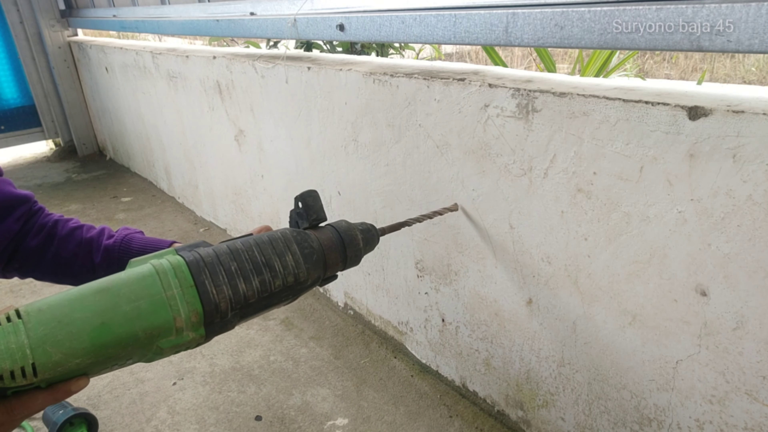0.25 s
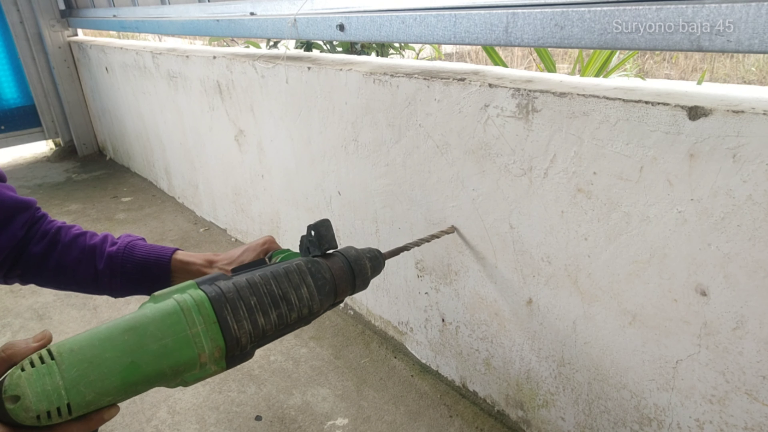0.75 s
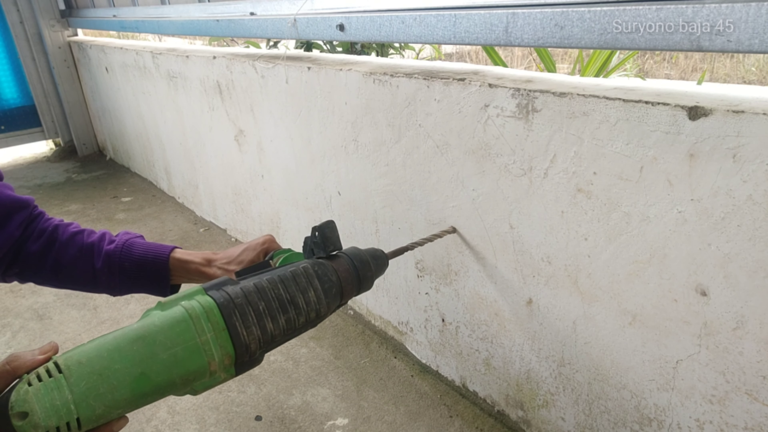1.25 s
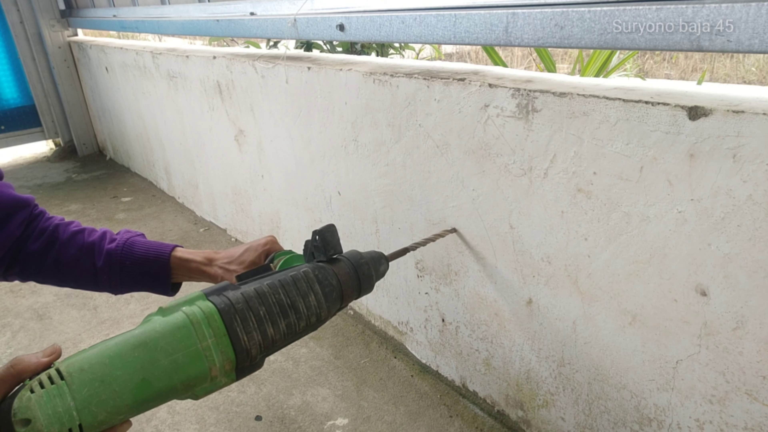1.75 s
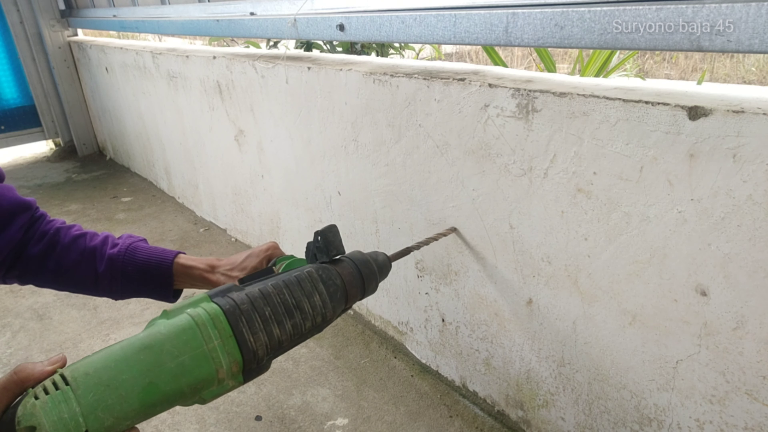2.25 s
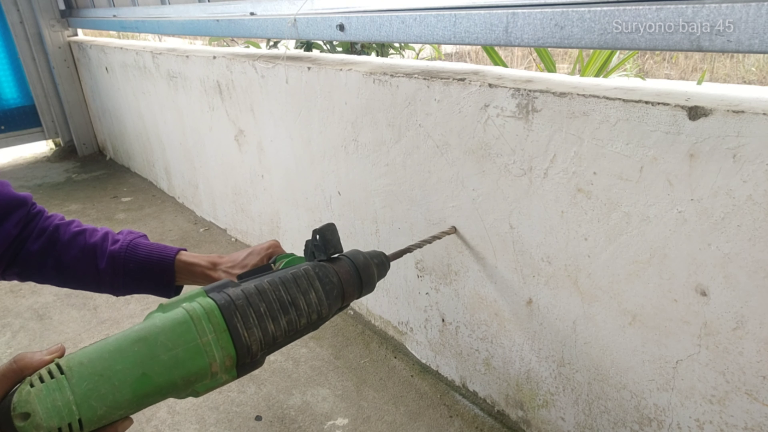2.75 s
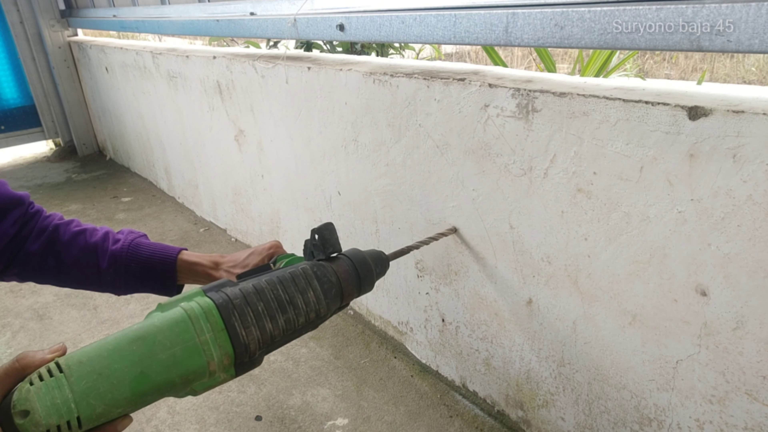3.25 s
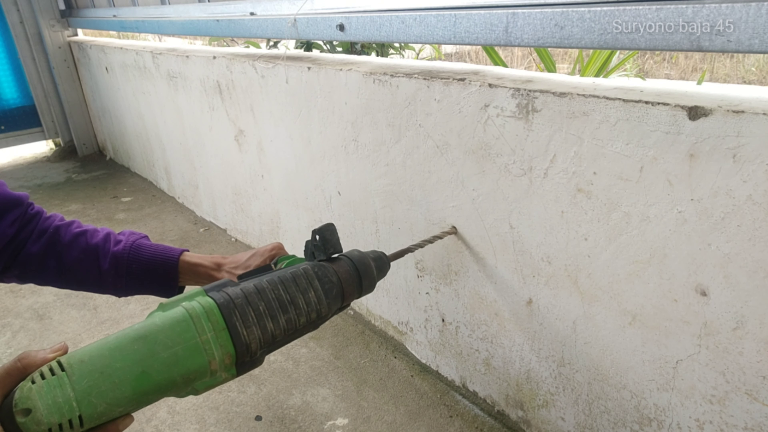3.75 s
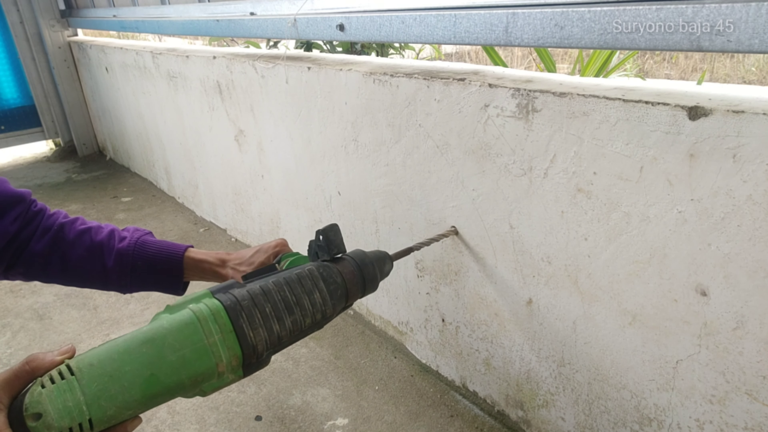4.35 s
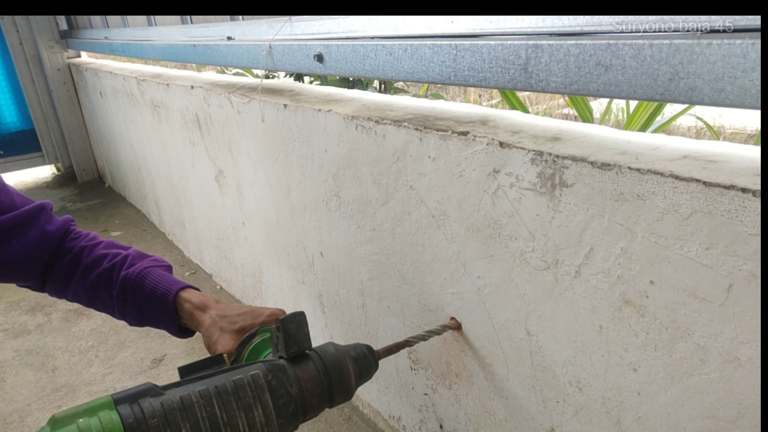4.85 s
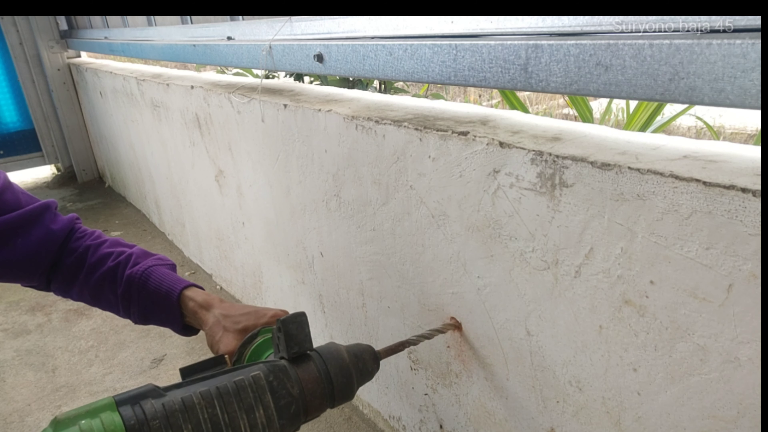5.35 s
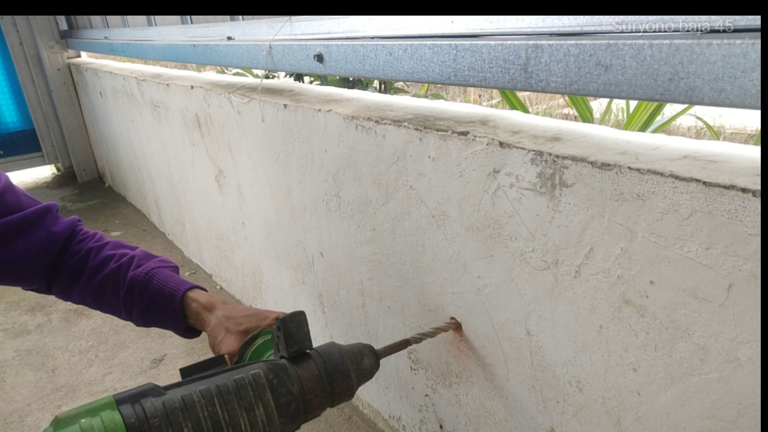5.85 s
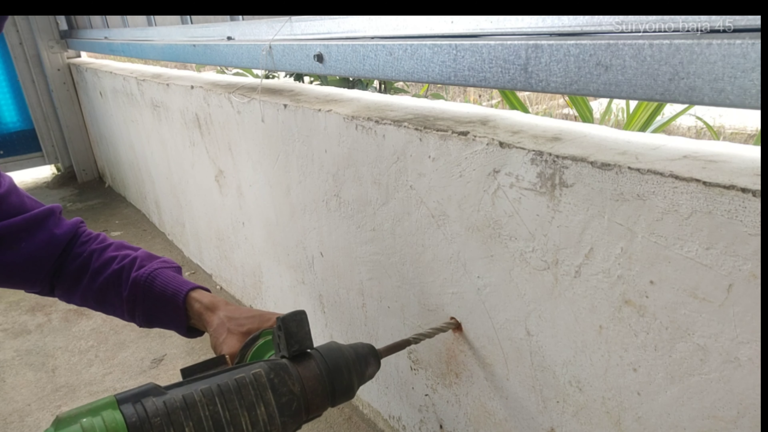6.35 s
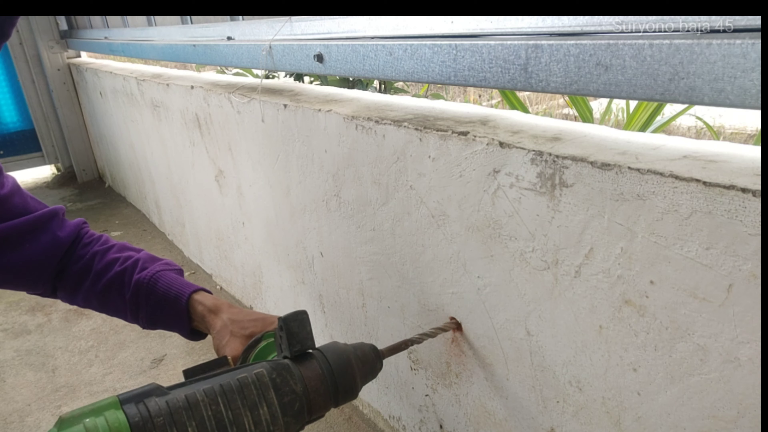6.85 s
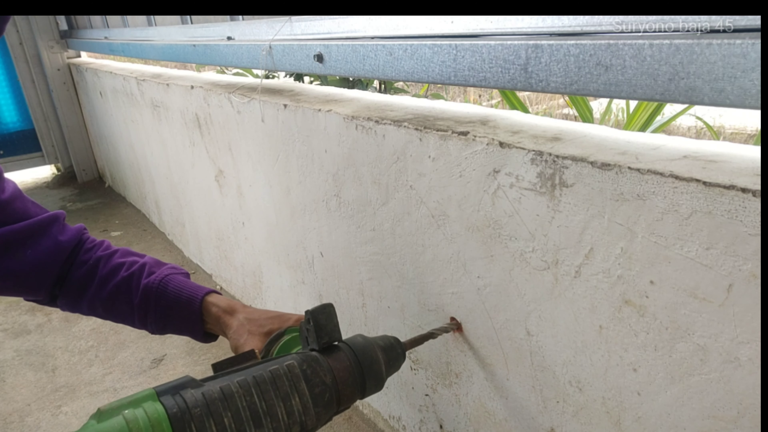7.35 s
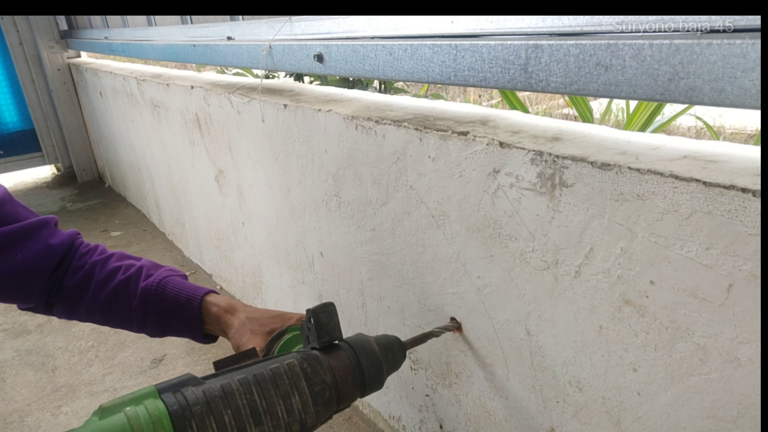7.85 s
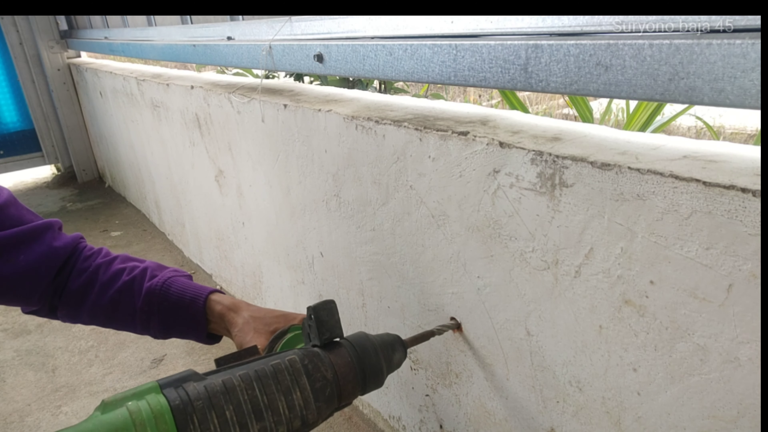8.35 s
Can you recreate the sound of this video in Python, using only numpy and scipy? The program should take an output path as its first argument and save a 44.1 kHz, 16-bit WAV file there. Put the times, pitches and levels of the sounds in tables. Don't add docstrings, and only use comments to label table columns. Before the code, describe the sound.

Electric hammer drill boring a plastered wall: faint handling, a quick rev, a longer whining run, a brief gap, then louder-pitched full-speed drilling that lightens.

```python
import sys
import numpy as np
from scipy import signal
from scipy.fft import rfft, irfft, next_fast_len
from scipy.io import wavfile
from scipy.ndimage import uniform_filter1d

SR = 44100
rng = np.random.default_rng(int(sys.argv[2]) if len(sys.argv) > 2 else 0)


def dump(signal):
    limited = np.clip(np.atleast_2d(signal).T, -1, 1)
    pcm = np.round(limited * 32767).astype(np.int16)
    wavfile.write(sys.argv[1], SR, pcm)


def ratio(d):
    e = np.asarray(d, float) / 20
    return 10 ** e


N = 379260
T = np.arange(N) / SR
FAST = next_fast_len(N + 8192)
HZ = np.fft.rfftfreq(FAST, 1 / SR) + 1e-3
CHANGE_S = 4.59565

# time in seconds, gear mesh pitch in Hz.
SQUEEZE = [
    (.93, 300),
    (1.1, 700),
    (1.2, 860),
    (1.39, 1270),
    (1.46, 1320),
    (1.54, 1080),
    (1.63, 765),
    (1.8, 400),
    (1.97, 200),
]
RESTART = [(1.99, 400), (2.12, 1040), (2.24, 1110), (2.285, 1280), (2.32, 1450), (2.41, 1585), (2.5, 1700),
           (2.6, 1775), (2.78, 1845)]
# time in seconds, mesh pitch in Hz.
MEDIUM_SPEED = [(2.23, 1855), (3.1, 1850), (3.42, 1872), (3.6, 1872), (3.8, 1858), (4.17, 1835),
                (4.3, 1865), (4.45, 1890), (4.59, 1900)]
FULL_SPEED = [(4.596, 2658), (5.1, 2662), (5.4, 2673), (5.55, 2692), (5.75, 2703), (5.95, 2697),
              (6.1, 2707), (6.7, 2709), (6.95, 2692)]
RELIEF_SPEED = [(7.1, 2662), (7.17, 2700), (7.27, 2725), (7.36, 2778), (7.5, 2796), (7.85, 2798),
                (8.1, 2781), (8.4, 2768), (8.6, 2757)]
# time in seconds, level in dB.
FIRST_ROAR = [(.93, -63), (.96, -57), (.99, -36.5), (1.02, -32.5), (1.42, -28), (1.6, -29.5), (1.81, -36.5),
              (1.86, -39.5), (1.971, -60)]
SECOND_ROAR = [(1.99, -63), (2.02, -56), (2.041, -37), (2.11, -29), (2.2, -29.5), (2.345, -29), (3.2, -28),
               (4.59, -28)]
THIRD_ROAR = [(4.596, -29), (6.9, -28.5), (7.055, -28), (7.3, -32), (7.68, -35), (8.6, -35)]
# frequency in Hz, level in dB per Hz.
CRAWL_COLOUR = [(120, -68), (200, -23), (283, -22), (586, -27.5), (959, -14), (1380, -13), (1570, -4.5),
                (1920, -9.5), (2100, -4.5), (2390, -12.5), (2660, -4), (2900, -7), (3120, -3.5),
                (3450, -11), (4120, -13.5), (7000, -17.5), (10400, -18), (15600, -42)]
SLOW_COLOUR = [(200, -22.5), (600, -26), (800, -16), (1300, -11), (1800, 0), (2500, -9.5), (2950, -4.5),
               (3400, -11.5), (4100, -21), (5000, -19.5), (5900, -25), (7100, -27), (9400, -23.5),
               (15600, -46)]
BORING_COLOUR = [(200, -16.5), (600, -11.5), (800, -3), (1200, -3), (1700, 3.5), (2350, 2.5), (3200, 0.5),
                 (4000, -5.5), (4800, -2.5), (5600, -9), (7200, -10), (9300, -7.5), (11500, -21),
                 (15600, -25)]
FREE_COLOUR = [(200, -19.5), (600, -13), (850, -7), (1600, 5.5), (2000, 2.5), (2900, 7), (3400, -0.5),
               (3800, -1.5), (4200, -3.5), (5500, -5), (6500, -7), (9100, -10.5), (12000, -18.5),
               (15600, -20)]
THUD_COLOUR = [(18, -45), (30, -15), (70, -7.5), (129, 1), (151, 2.5), (210, -6.5), (280, 4), (360, -33),
               (620, -120)]
# frequency in Hz, width in Hz, level in dB.
FREE_GAPS = [(1300, 250, -7), (2150, 150, -5), (2430, 200, -7), (2930, 250, -6), (3400, 300, -4),
             (4650, 1100, -10), (6200, 250, -12), (6900, 500, -8), (7450, 200, -5), (7720, 200, -7),
             (8230, 200, -6), (9720, 200, -7), (10150, 250, -9), (11050, 350, -11), (11430, 250, -18),
             (12200, 200, -9), (12830, 200, -11), (13750, 250, -18), (8500, 250, -4), (14500, 150, -18),
             (14850, 300, -20)]
# time in seconds, level in dB.
PUSH = [(.76, -79), (.9, -62), (1.08, -77), (1.2, -84), (1.4, -64), (1.93, -74), (1.97, -80), (2.1, -68),
        (2.35, -73), (3.3, -64), (4.0, -57.5), (4.59, -62), (4.6, -67), (5.3, -67), (5.55, -54),
        (7.18, -53.5), (7.45, -69.5), (8.6, -74.5)]
# time in seconds, share lost from 0 to 1.
DYING = [(1.72, 0), (1.82, .5), (1.97, .5), (2.0, 0)]
PINION_TEETH = 7
PULL_S, CAUGHT_UP_S = 2.24, 2.78
LETS_GO_S = 7.15, 7.45
MESH_DB = (-3.5, -12, -5, -2)
GRIT_DB = (-13.5, -9.5, -8, -7.5)
GROWL_DB = (-20, -17.5, -16, -16.5)
GRIT_DB_PER_OCTAVE, GRIT_FULL_HZ = 3, 1320
MESH_DB_PER_OCTAVE, MESH_FAINT_HZ = 14, 760
SLACK_DB, STRAIN_DB = -4.5, 2
DIP_HZ, DIP_WIDTH_HZ, DIP_DB = 7150, 450, -7
HUMP_HZ, HUMP_WIDTH_HZ = 2900, 500


def drill():
    roar_db = over_time(FIRST_ROAR + SECOND_ROAR + THIRD_ROAR)
    running_hz = over_time(MEDIUM_SPEED + FULL_SPEED + RELIEF_SPEED)
    mesh_hz = np.where(T < CAUGHT_UP_S, over_time(SQUEEZE + RESTART), running_hz)
    shaft_hz = mesh_hz / PINION_TEETH
    turns = np.cumsum(shaft_hz) / SR

    pace = np.interp(shaft_hz, (190, 250), (0, 1))
    load = np.interp(T, LETS_GO_S, (1, 0))
    changed = T >= CHANGE_S
    states = np.sqrt([~changed * (1 - pace), ~changed * pace, changed * load, changed * (1 - load)])

    mesh_db, grit_db, growl_db = np.array([MESH_DB, GRIT_DB, GROWL_DB]) @ states ** 2
    grit_db = grit_db + GRIT_DB_PER_OCTAVE * np.minimum(np.log2(mesh_hz / GRIT_FULL_HZ), 0)
    mesh_db = mesh_db + MESH_DB_PER_OCTAVE * np.minimum(np.log2(mesh_hz / MESH_FAINT_HZ), 0)

    start_s = FIRST_ROAR[0][0]
    started = np.interp(T, (start_s - .03, start_s), (0, 1))
    behind = np.clip(1 - mesh_hz / over_time(MEDIUM_SPEED), 0, 1)
    behind = behind * np.interp(T, (PULL_S + .03, PULL_S + 0.13), (0, 1))
    strain_db = STRAIN_DB * np.minimum(behind / 0.41, 1)
    glide = np.gradient(mesh_hz) * SR
    coasting = uniform_filter1d(1. * (np.abs(glide - 2500) > 3000), size=2000)

    kick = blows(turns, shaft_hz)
    whine_db = roar_db + mesh_db + strain_db
    lines_db = roar_db + SLACK_DB * coasting + strain_db
    out = gear_whine(turns, whine_db, lines_db, states, kick - kick.mean()) * started

    gaps_db = sum(db * np.exp(-(2 * (HZ - hz) / width) ** 2) for hz, width, db in FREE_GAPS)
    dip_db = DIP_DB * np.exp(-(2 * (HZ - DIP_HZ) / DIP_WIDTH_HZ) ** 2)
    colours = (over_hz(CRAWL_COLOUR) + dip_db, over_hz(SLOW_COLOUR) + dip_db,
               over_hz(BORING_COLOUR), over_hz(FREE_COLOUR) + gaps_db)
    buzz = 1 + .08 * np.cos(2 * np.pi * T * SR / 256)
    punches = (0.91, False), (0.52, False), (0.42, True), (0.13, True)
    for state, colour, (punch, place) in zip(states, colours, punches):
        spectra = noise_pair((1 + punch * kick) * ratio(0.33 * walk(60)), place)
        roar = ratio(-5.5) * band(spectra, colour, 1023, 2930)
        roar += ratio(grit_db + 0.32 * walk(24)) * buzz * band(spectra, colour, 3670, SR / 2)
        roar += ratio(growl_db) * band(spectra, colour, 303, 900)
        thud = ratio(over_time(PUSH) + 0.9 * walk(7.3)) * band(spectra, over_hz(THUD_COLOUR), 36, 226)
        out += state * (started * ratio(roar_db) * roar + thud)

    bell = np.exp(-((HZ - HUMP_HZ) / HUMP_WIDTH_HZ) ** 2)
    hump = irfft(rfft(out, FAST) * bell, FAST)[:, :N]
    return out - over_time(DYING) * hump


# multiple of shaft speed, level above the roar
# in dB when crawling, slow, boring and free, wobble rate per second.
SHAFT_ORDERS = [(1.004, -42, -34, -30.5, -25.5, 60), (1.993, -16.5, -29, -18.5, -22, 50),
                (2.126, -58, -38.5, -41, -22, 21), (2.54, -45, -54, -34, -24.5, 30),
                (2.93, -45, -42, -32, -21.5, 70), (3.86, -40, -50, -23.5, -35, 23),
                (3.985, -27, -22.5, -23, -12.5, 80), (4.27, -45, -42, -27, -20, 30),
                (4.45, -40, -35, -18.5, -33, 30), (5.11, -50, -41, -53, -20, 30),
                (5.77, -40, -31, -19, -27, 30), (6.36, -39, -18.5, -21, -32, 30),
                (6.787, -33, -26, -32, -40, 22), (6.58, -23, -22.5, -16.5, -38, 9),
                (6.71, -22, -30, -15.5, -31, 80), (7.67, -19, -16, -18.5, -34, 23),
                (8.0, -40, -28, -35, -16, 70),
                (8.32, -33, -19.5, -31, -35, 77), (9.02, -40, -40, -30, -29, 50),
               (12.0, -40, -40, -40, -25, 40), (9.14, -40, -33, -51, -40, 30),
               (9, -35, -24.5, -23, -38, 28), (9.94, -35, -35, -20.5, -14, 80),
               (12.11, -36, -22, -20.5, -34, 120), (13.74, -11.5, -16.5, -24, -17.5, 90),
               (14.04, -8.5, -21, -23.5, -17.5, 60), (14.26, -20, -30, -25.5, -25, 41),
               (17.93, -14, -29, -36, -32, 130), (19.96, -22, -28, -20, -14, 30),
               (21.16, -10.5, -24, -33, -22.5, 220), (22.3, -24, -45, -31, -29, 50),
               (23.0, -26, -55, -40, -23.5, 120), (26.5, -40, -57, -44, -28, 200),
               (24.34, -23, -57, -37, -42, 100), (27.5, -16.5, -45, -38, -40, 120),
               (30.1, -28, -46, -34, -28, 180)]
WANDER_RAD, FLUTTER = 1.5, .3
SKIRT_RATE = 30
STEADY_RATE = 20
FLARE_HZ, FLARE_WIDTH_HZ, FLARE_DB = 1620, 160, 5


def gear_whine(turns, mesh_db, roar_db, states, kick):
    mesh_size = ratio(mesh_db + .9 * walk(25)) * (1 + .3 * kick)
    mesh = mesh_size * np.sin(2 * np.pi * PINION_TEETH * turns + .35 * walk(30) + .25 * walk(90))
    lines = np.zeros_like(states)
    for order, *state_db, rate in SHAFT_ORDERS:
        spin = 2 * np.pi * order * turns
        core = STEADY_RATE / rate
        wobble_rate = max(rate, SKIRT_RATE)
        drift = WANDER_RAD / np.hypot(1, core) * walk(wobble_rate)
        size = np.sqrt(core ** 2 + 2) * (1 + FLUTTER * walk(wobble_rate))
        lines += ratio(np.array(state_db))[:, None] * (size * np.sin(spin + drift))
    crawl, slow, boring, free = (lines * ratio(roar_db) + np.sqrt(2) * mesh) * states
    flare_db = FLARE_DB * np.exp(-((HZ - FLARE_HZ) / FLARE_WIDTH_HZ) ** 2)
    gliding = heard(crawl, False, over_hz(CRAWL_COLOUR) + flare_db)
    return gliding + heard(slow, False) + heard(boring + free, True)


BLOWS_PER_TURN = .213


def blows(turns, shaft_hz, scatter_db=-3.5, ring_s=0.0076):
    cycle = BLOWS_PER_TURN * turns + .08 * walk(25)
    sizes = ratio(scatter_db * rng.standard_normal(N // 100))
    size = sizes[np.floor(cycle).astype(int) + 1]
    return size * np.exp(-(cycle % 1) / (BLOWS_PER_TURN * shaft_hz * ring_s))


# time in seconds, peak in dB, pitch in Hz.
HARD_BLOWS = [(1.0177, -17, 1680), (1.061, -26, 2700), (1.0929, -19, 1460), (1.1232, -30, 1540),
              (1.182, -19, 1680), (1.238, -23, 2830), (1.3205, -20, 1180), (1.3529, -13.5, 2590),
              (1.3823, -23, 1520), (1.4244, -25, 2650), (1.445, -16, 2650), (1.5534, -17, 2060),
              (1.5978, -27, 1710), (1.625, -25, 1600), (1.673, -27, 3000), (1.686, -22, 1710),
              (1.694, -22, 2900), (1.705, -23, 2100), (1.728, -26, 1650), (1.789, -23, 1770),
              (2.0167, -41, 1180), (2.058, -25, 2100), (2.0778, -24, 1630), (2.239, -23, 2810),
              (2.2544, -21, 2790), (2.293, -18, 2640), (2.316, -27, 1420), (2.3394, -22, 1500),
              (2.445, -19, 1660)]
HARD_TRIM_DB, HARD_T60_S = -4, .022
# time in seconds, peak in dB, pitch in Hz, 60 dB decay in seconds.
TICKS = [(0.1894, -75.5, 1070, 0.025), (0.279, -61, 5300, 0.025), (.281, -64, 4500, .02),
         (1.8, -39, 380, 0.094), (0.3, -64, 7750, 0.012), (0.368, -51, 2860, 0.019),
         (0.458, -76, 902, 0.025), (0.5761, -62, 5070, 0.023), (0.652, -55, 7700, 0.015),
         (.655, -60, 520, .04), (.369, -64, 1100, .025), (0.8826, -46, 3200, 0.012),
         (0.9023, -42, 1260, 0.028), (0.942, -48, 6000, 0.015), (.902, -50, 7000, .012),
         (.962, -44, 7000, .015), (.666, -66, 8000, .012), (.989, -42, 8000, .012),
         (0.9613, -39, 1150, 0.027), (1.9914, -44, 2170, 0.025), (2.0372, -22, 1600, 0.012),
         (2.113, -21, 2600, 0.036), (2.1255, -17, 2200, 0.025), (4.4462, -17.5, 1660, 0.029)]
# frequency in Hz, level in dB.
CASING = [(100, -30), (400, -6), (700, 0), (15000, 0)]
COAST_S, COAST_GAP_S, COAST_DRAG_S = 1.8712, .0072, .00008
COAST_DB, COAST_LOSS_DB, COAST_HZ = -31, -1.7, 1950


def ticks():
    out, t = np.zeros(N), T[:SR // 10]
    rows = list(TICKS)
    for k in range(10):
        click_s = COAST_S + COAST_GAP_S * k + COAST_DRAG_S * k * k
        rows.append((click_s, COAST_DB + COAST_LOSS_DB * k, COAST_HZ, .012))
    rows += [(s, db + HARD_TRIM_DB, hz, HARD_T60_S) for s, db, hz in HARD_BLOWS]
    cracks = rng.standard_normal((len(rows), len(t)))
    for (s, db, hz, t60), crack in zip(rows, cracks):
        phase = 2 * np.pi * hz * t
        ring = np.sin(phase) + 0.6 * np.sin(0.8 * phase) + 0.6 * np.sin(1.19 * phase)
        soft = uniform_filter1d(crack, size=max(int(SR / hz / 2.5), 2)) - uniform_filter1d(crack, size=60)
        knock = 0.59 * min(2600 / hz, 1) * ring + 0.57 * soft
        shape = (1 - np.exp(-t * hz / 0.8)) * 1000. ** (-t / max(t60, .003))
        out[int(s * SR):][:len(t)] += ratio(db) * knock * shape
    return heard(out, False, over_hz(CASING))


# frequency in Hz, level in dB per Hz.
YARD_COLOUR = [(18, -42), (30, -15), (85, -28), (111, -14), (150, -2), (200, -8.5), (260, -21), (380, -16),
               (560, -22.5), (750, -29), (1200, -25), (1600, -31.5), (4000, -37), (15600, -55)]
# time in seconds, rumble in dB, rustle in dB, rise and fall in seconds.
SHUFFLES = [(0.0, -72, -76.5, .05, 0.12), (.08, -74, -78, 0.036, 0.055), (.196, -64, -78, .015, 0.027),
            (.25, -72, -84, .02, 0.025), (.33, -73, -75, .02, 0.028), (.365, -72, -79.5, 0.014, 0.02),
            (.405, -74, -84, .02, .02), (.465, -81, -79, .01, .02), (.58, -79, -90, .01, .02),
            (0.655, -69, -65.5, .003, 0.016), (.82, -71, -77, 0.052, 0.044),
            (.904, -65.5, -63.5, 0.022, 0.24)]
# time in seconds, level in dB, half length in seconds.
PUFFS = [
    (0.933, -60, 0.11),
    (1.9, -68, 0.048),
    (7.897, -66, 0.07),
]
STILL_DB, STIRRED_DB = (-85, -87), -71
INSECT_HZ, INSECT_DB = 7140, -92


def yard():
    spectra = noise_pair(ratio(1.5 * walk(25)), False)
    stirred = np.interp(T, (.93, 1.0), (0, 1))
    size = ratio(np.array(STILL_DB))[:, None] + np.outer((0, ratio(STIRRED_DB)), stirred)
    for s, rumble_db, rustle_db, rise, fall in SHUFFLES:
        shape = np.exp(-np.abs(T - s) / np.maximum(np.where(T < s, rise, fall), .002))
        size = size + np.outer(ratio(np.array([rumble_db, rustle_db])), shape)
    gusts = sum(ratio(db) * np.exp(-((T - s) / half) ** 2) for s, db, half in PUFFS)
    wind = gusts * band(spectra, 0., 71, 103)
    chirr_db = np.maximum(-np.abs(HZ - INSECT_HZ), -10 - np.abs(HZ - 2 * INSECT_HZ)) / 12
    insect = ratio(INSECT_DB + 1.7 * walk(8.0)) * band(spectra, chirr_db, 10, SR)
    rumble = size[0] * band(spectra, over_hz(YARD_COLOUR), 30, 360)
    rustle = size[1] * band(spectra, over_hz(YARD_COLOUR), 365, 16000)
    return rumble + rustle + insect + wind


# frequency in Hz, lead of the left in radians.
LEAD = [
    [(150, 0), (1460, 0.2), (1720, 1.5), (2580, 0.6), (3010, 1.8), (5770, 0.2), (6550, 0.0), (8350, 7.9), (9390, 8.5), (11200, 19.5), (12200, 12.4), (13200, 8.8), (13800, 2.3), (15900, 7.6)],
    [(150, 0), (340, -0.6), (690, 0.7), (1210, 0.9), (2000, 1.7), (2930, 2.0), (5340, 0.6), (7670, 4.7), (8350, 1.2), (11000, 1.0), (12700, -9.5), (13000, -9.1), (14000, -15.5), (14600, -15.7), (15900, -20.4)],
]
# frequency in Hz, left minus right in dB.
LEAN = [
    [(60, -2), (110, 0.5), (200, -2), (380, 1), (700, -1), (1290, -0.82), (2380, -2), (4400, 1), (8120, -0.98), (15000, -1.2)],
    [(60, -6), (110, 0.5), (200, -4), (380, 5.5), (700, 0), (1290, 1.5), (2380, -4.5), (4400, 2), (8120, -1), (15000, -3)],
]


def ports(place):
    half = ratio(over_hz(LEAN[place]) / 2) * np.exp(.5j * over_hz(LEAD[place]))
    return np.array([half, 1 / half])


def heard(x, place, colour_db=0.):
    return irfft(ports(place) * ratio(colour_db) * rfft(x, FAST), FAST)[:, :N]


# frequency in Hz, shared part from 0 to 1.
ALIKE = [(60, .99), (160, .975), (250, .62), (500, .85), (1000, .42), (2000, .6), (4000, .4), (8000, .25),
         (12000, .5)]


def noise_pair(gate, place):
    direct, left, right = rfft(gate * rng.standard_normal((3, N)), FAST)
    share = np.clip(over_hz(ALIKE), 0, 1)
    return ports(place) * (np.sqrt(share) * direct + np.sqrt(1 - share) * np.array([left, right]))


def band(spectra, colour_db, lo_hz, hi_hz):
    edge = 1 / np.sqrt((1 + (lo_hz / HZ) ** 12) * (1 + (HZ / hi_hz) ** 12))
    return unit(irfft(spectra * ratio(colour_db) * edge, FAST)[:, :N])


def walk(rate):
    k = max(int(SR / rate), 200)
    held = rng.standard_normal(N // 200 + 1)[:N // k + 1]
    slewed = uniform_filter1d(np.repeat(held, k), k)
    return unit(uniform_filter1d(slewed, k)[:N])


def unit(x):
    return x / np.sqrt(np.mean(x ** 2))


def over_hz(table):
    hz, value = np.transpose(table)
    return np.interp(np.log(HZ), np.log(hz), value)


def over_time(table):
    return np.interp(T, *np.transpose(table))


# time in seconds, spread in dB.
MOTTLE = [(0, 3.5), (.9, 3.5), (1.0, 0), (7.2, 0), (7.5, 1.2), (8.6, 1.2)]
PATCHY_HZ, HALF_KEPT_HZ, THINNING_HZ = 10300, 14700, 4500
TOP_HZ = 15470


def starved(x, under_db=-31.5, size=1024):
    hz, when, z = signal.stft(x, SR, nperseg=size)
    hz = hz[:, None]
    power = uniform_filter1d(np.abs(z) ** 2, size=5, axis=1)
    power = uniform_filter1d(power, size=2, axis=2) + 1e-20
    top = power.max(axis=1, keepdims=True)
    floor = top ** 2 / (top + 1e-7)
    margin_db = 10 * np.log10(power / floor) - under_db + 4.6 * (hz - 7000) / 1000
    keep = np.where(hz > 5500, 1 / (1 + np.exp(-np.clip(margin_db / .7, -30, 30))), 1)
    luck = uniform_filter1d(rng.standard_normal(z.shape[1:]), size=5, axis=0)
    luck = unit(uniform_filter1d(luck, size=2, axis=1))
    keep = keep * ((hz < PATCHY_HZ) | (top < 1e-7) | (luck > (hz - HALF_KEPT_HZ) / THINNING_HZ))
    mottle = ratio(luck * np.interp(when, *np.transpose(MOTTLE)))
    return signal.istft(z * keep * mottle * (hz < TOP_HZ), SR, nperseg=size)[1][:, :N]


def scene():
    return drill() + yard() + ticks()


def top_cut(x):
    return signal.sosfilt(signal.butter(12, 16390, fs=SR, output="sos"), x)


DROP_S, DROP_DB, SLIDE_DB_PER_S, FADED_S = 4.452, -6.5, -26, 4.556


def record(dry):
    drop_db = np.interp(T, (DROP_S - .01, DROP_S + 0.0094), (0, DROP_DB))
    slide = ratio(drop_db + SLIDE_DB_PER_S * np.clip(T - DROP_S, 0, 1))
    fade = slide * np.interp(T, (FADED_S - .065, FADED_S), (1, 0)) ** 1.43
    faded = starved(dry) * np.where(T < CHANGE_S, fade, 1)
    after = np.maximum(T - CHANGE_S, 0)
    pop = ratio(-12) * (T >= CHANGE_S) * np.exp(-(after / 0.00017) ** 2)
    return top_cut(faded + np.array([pop, np.zeros(N)]))


dry = scene()
out = record(dry)
dump(out)
```